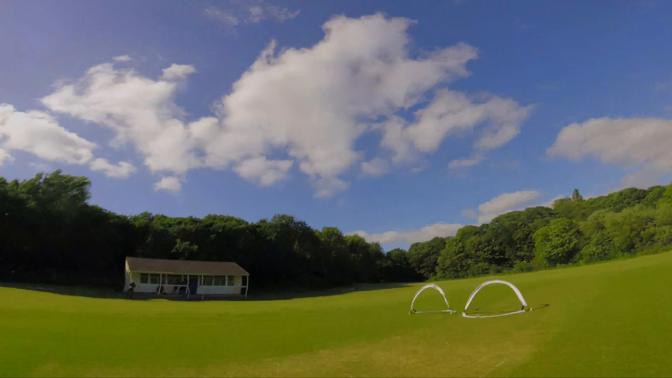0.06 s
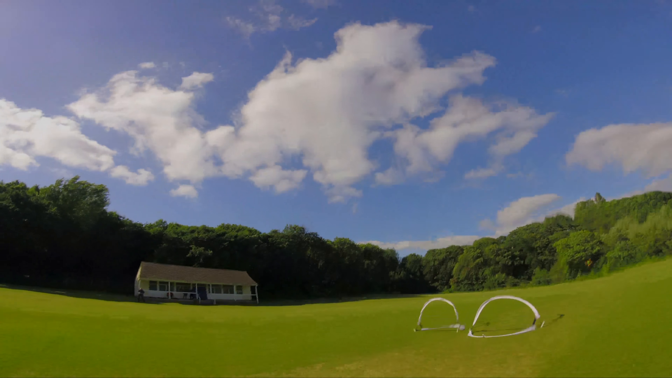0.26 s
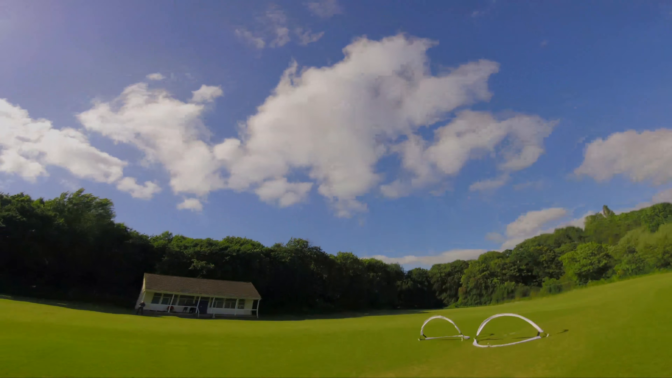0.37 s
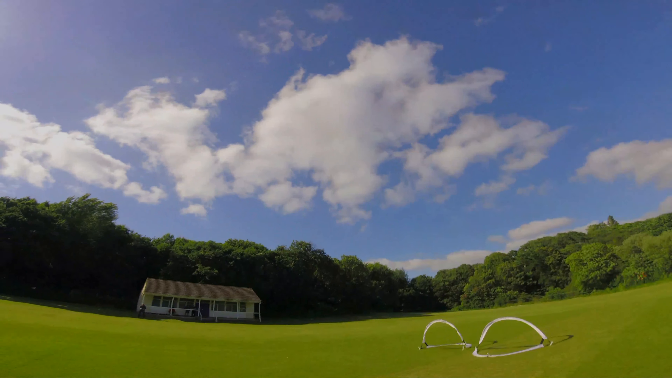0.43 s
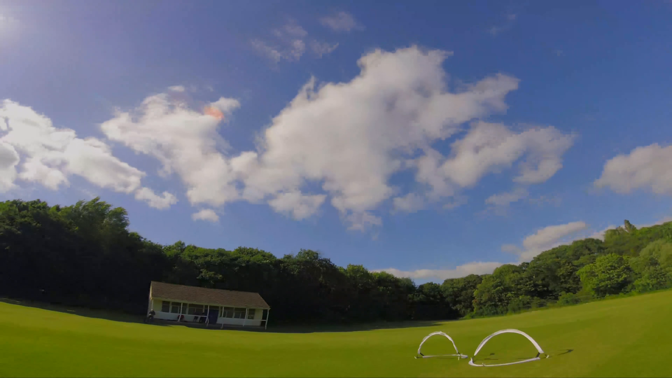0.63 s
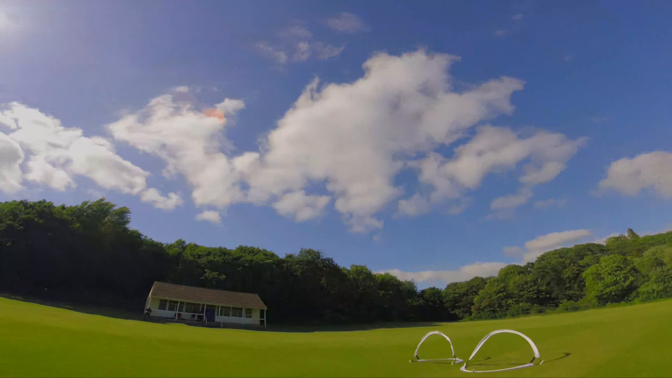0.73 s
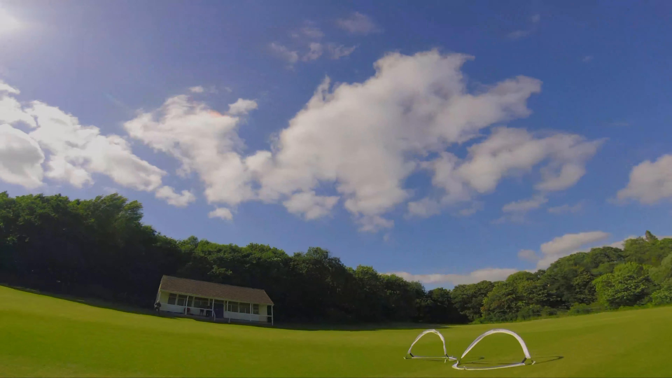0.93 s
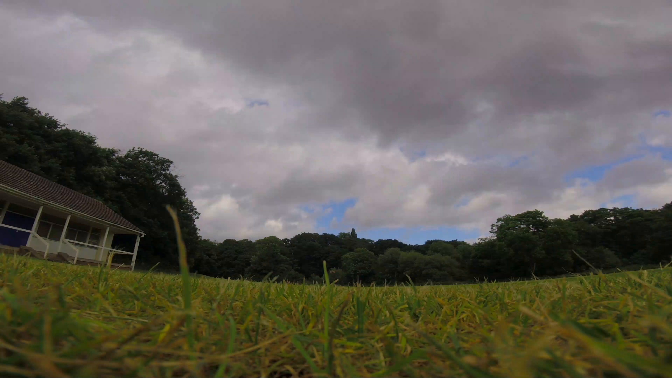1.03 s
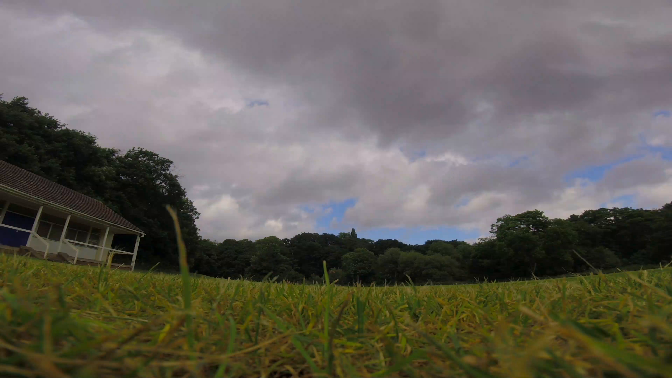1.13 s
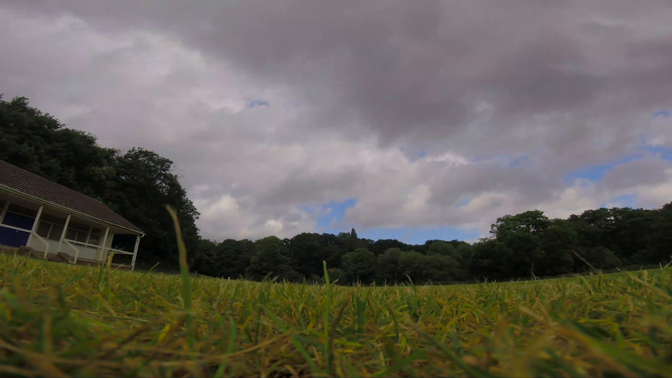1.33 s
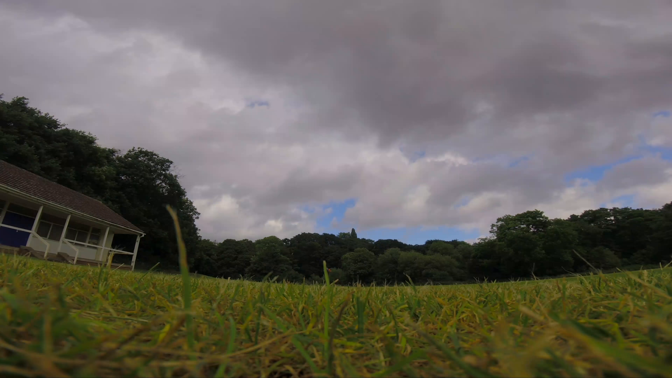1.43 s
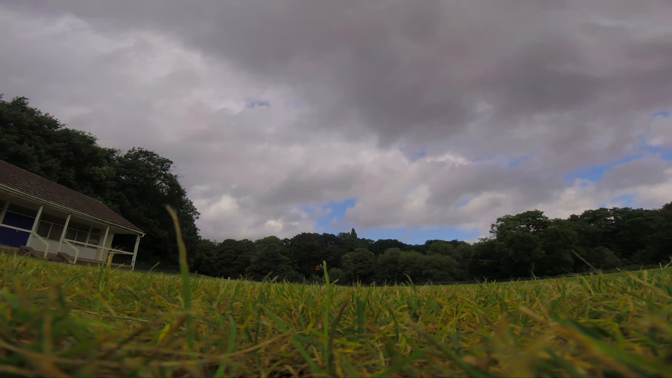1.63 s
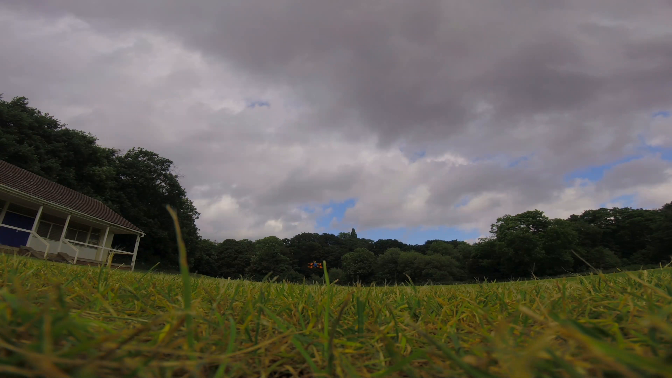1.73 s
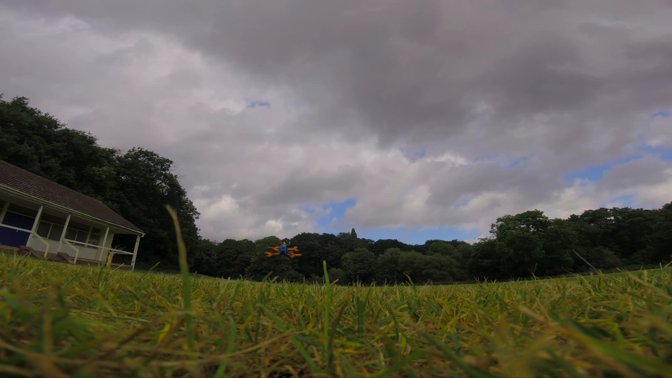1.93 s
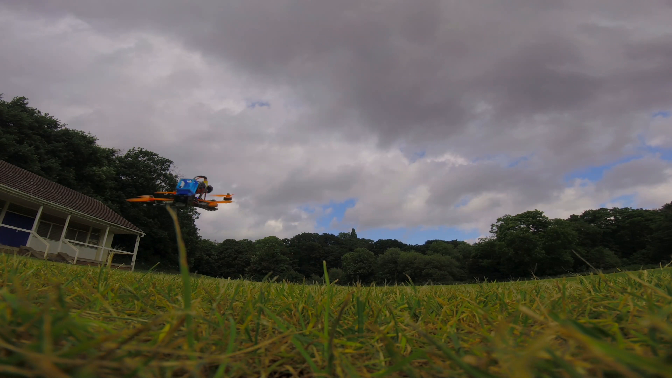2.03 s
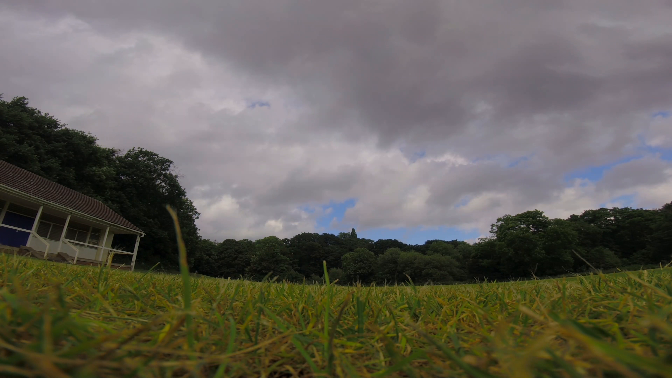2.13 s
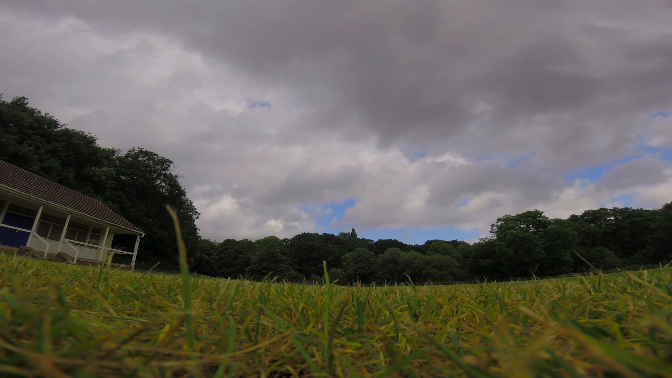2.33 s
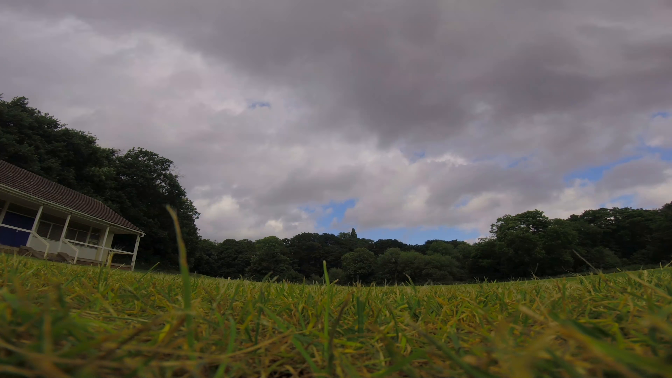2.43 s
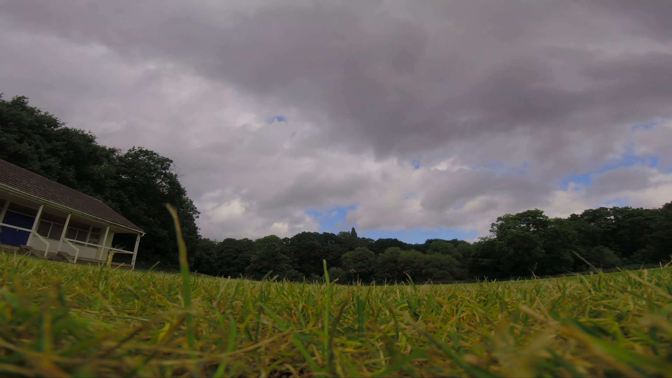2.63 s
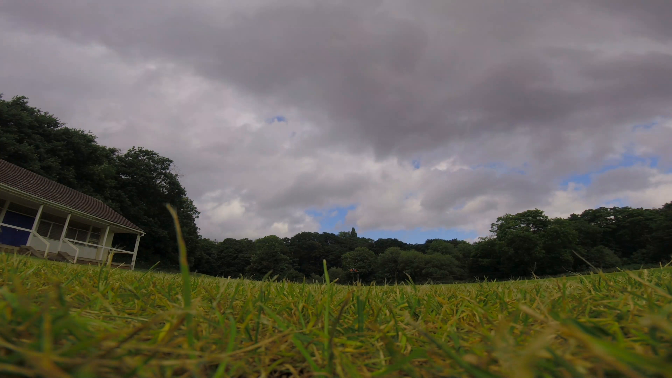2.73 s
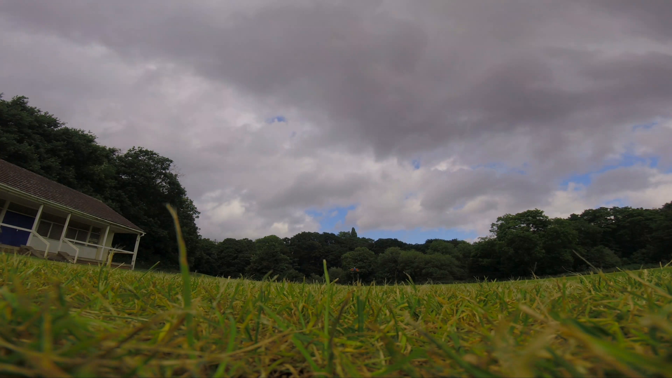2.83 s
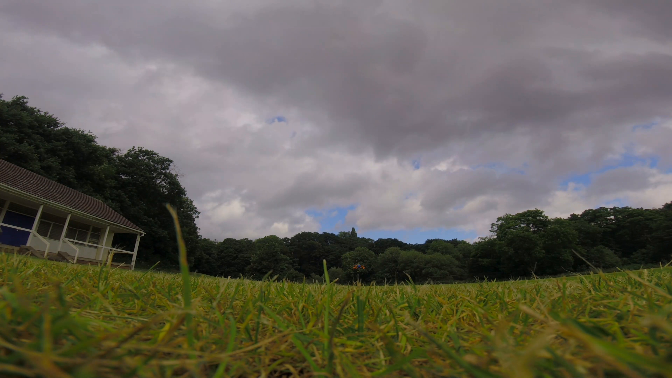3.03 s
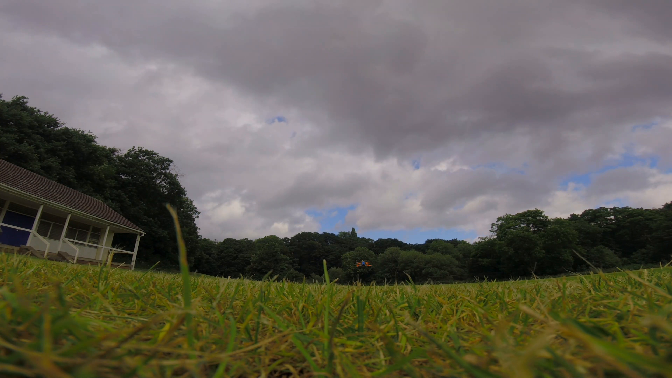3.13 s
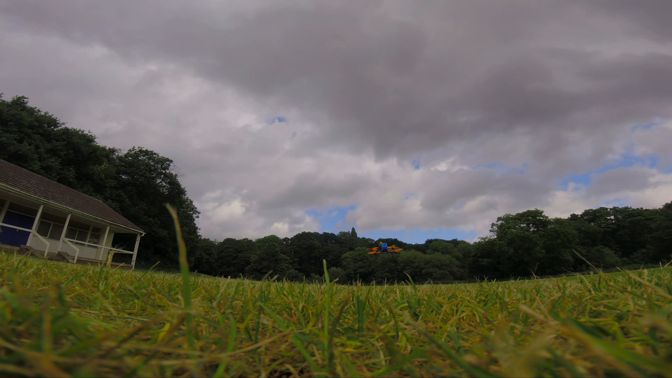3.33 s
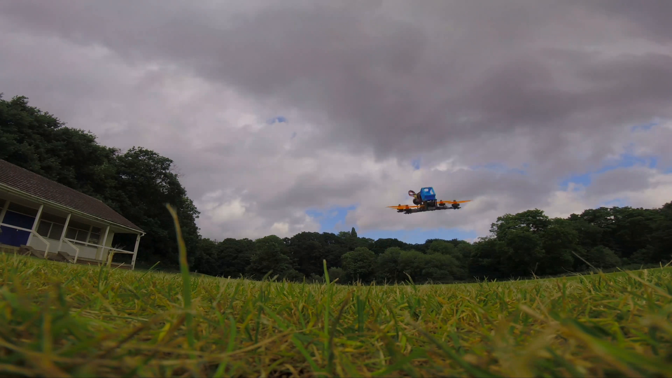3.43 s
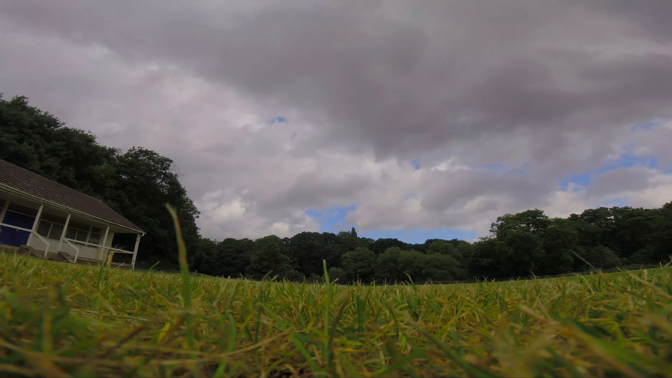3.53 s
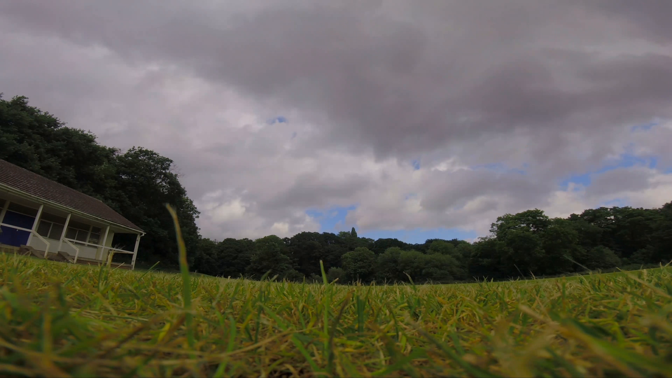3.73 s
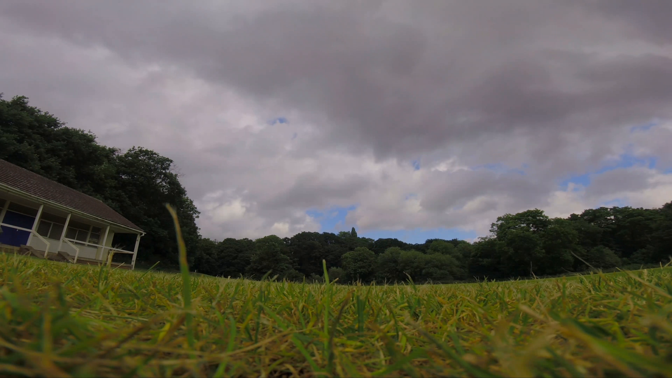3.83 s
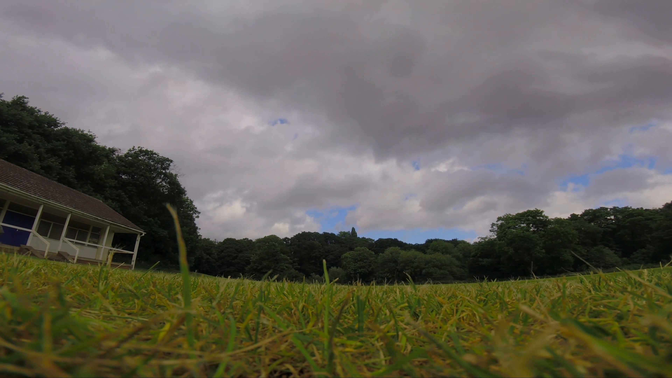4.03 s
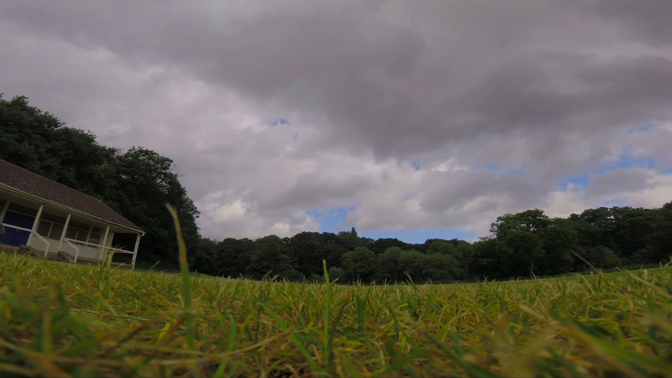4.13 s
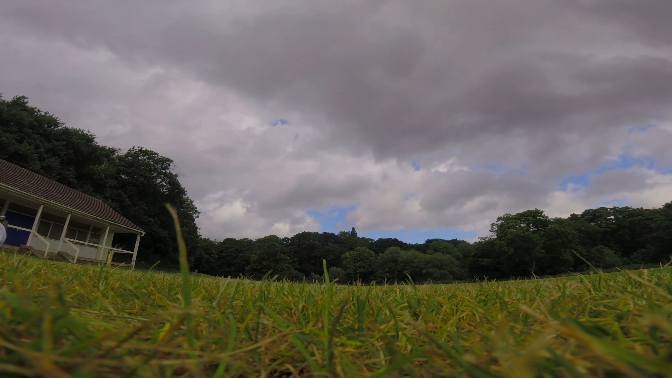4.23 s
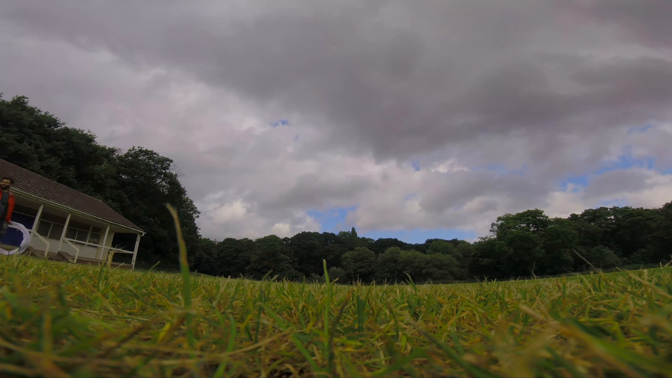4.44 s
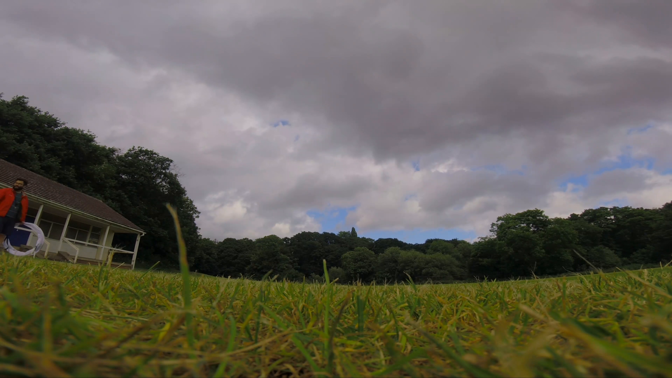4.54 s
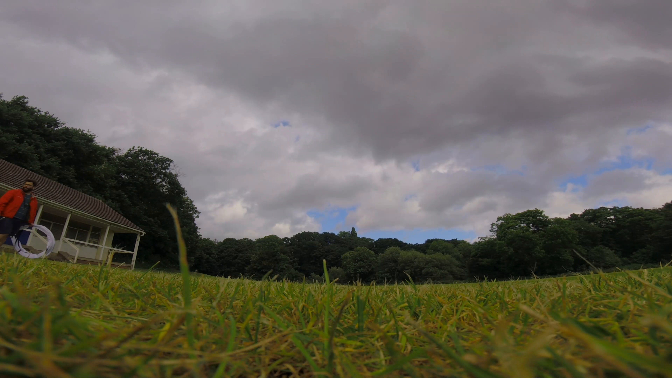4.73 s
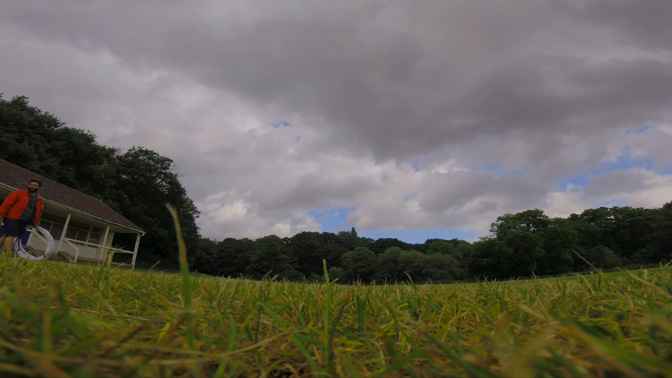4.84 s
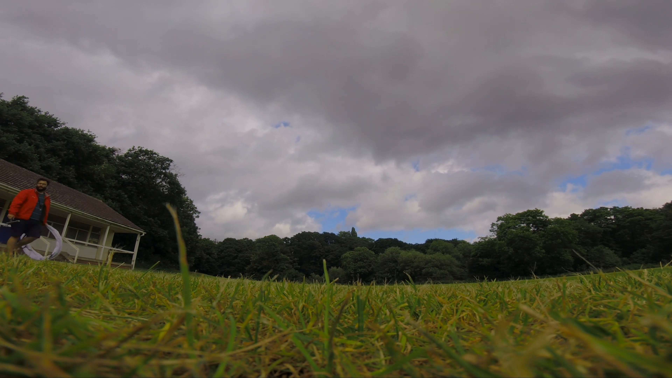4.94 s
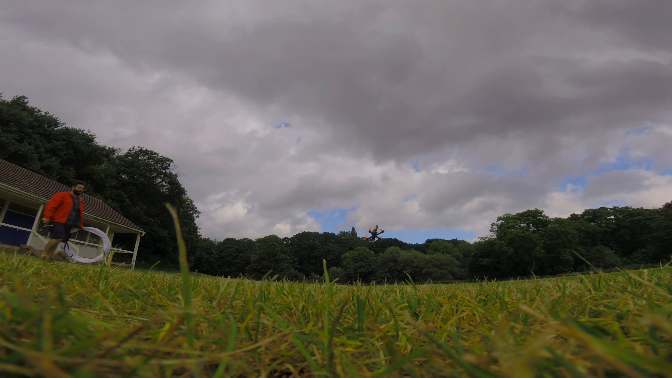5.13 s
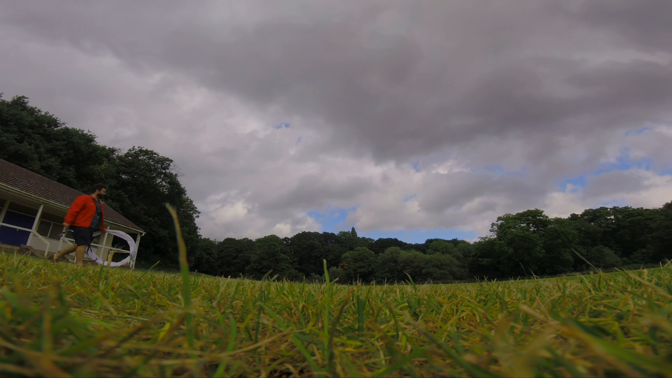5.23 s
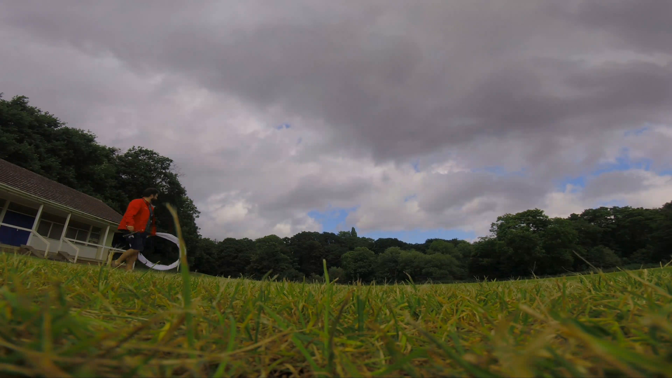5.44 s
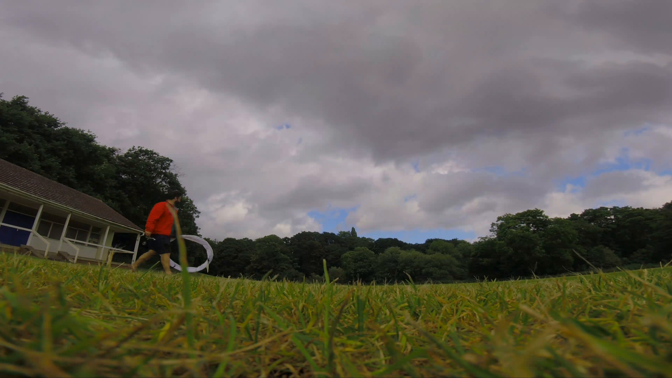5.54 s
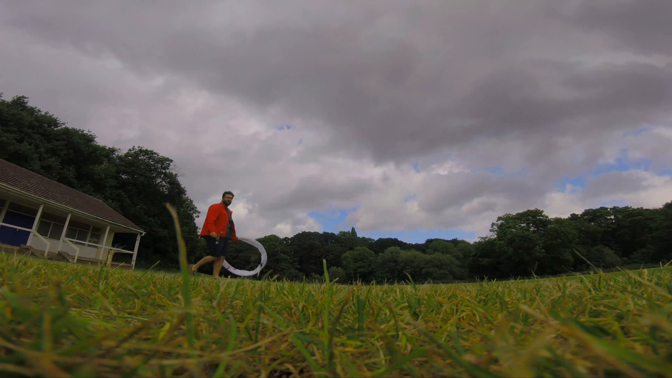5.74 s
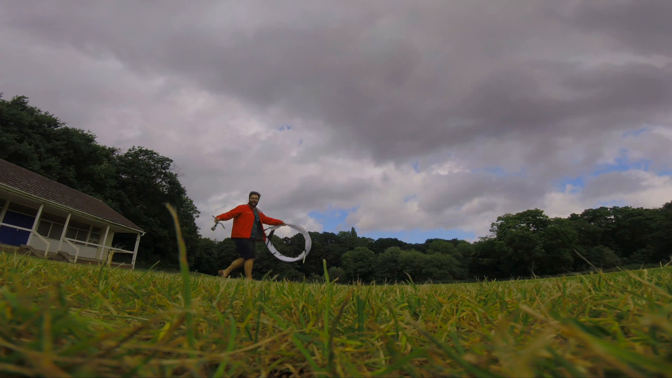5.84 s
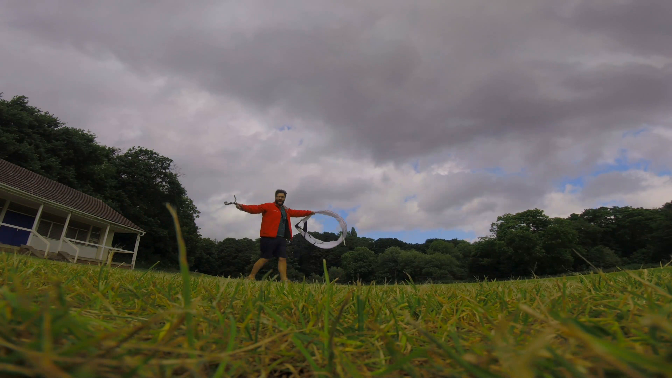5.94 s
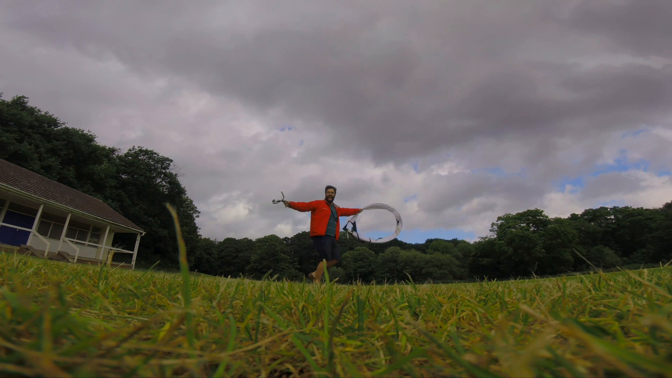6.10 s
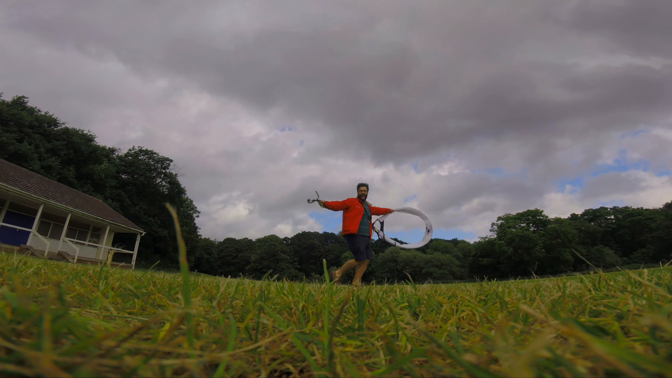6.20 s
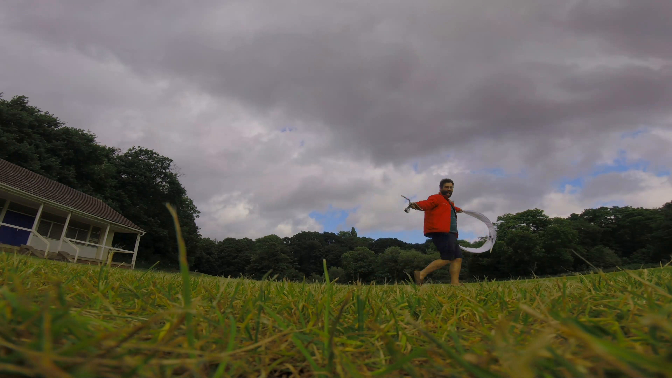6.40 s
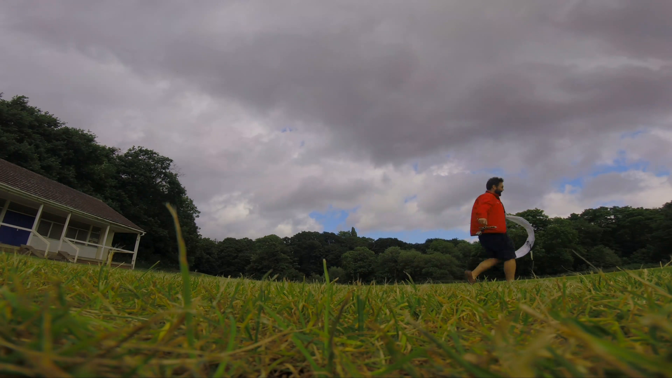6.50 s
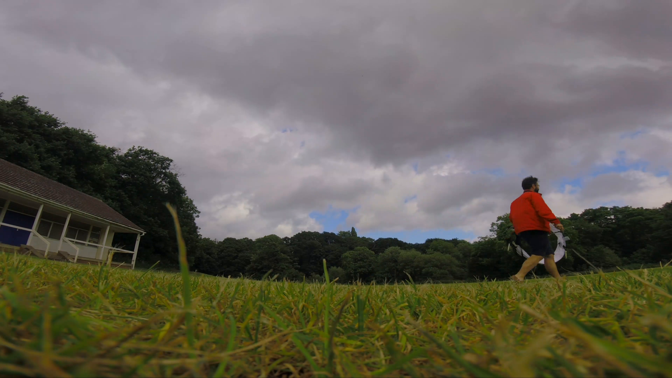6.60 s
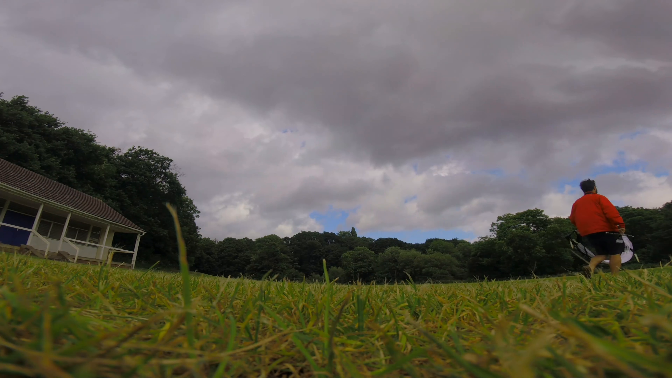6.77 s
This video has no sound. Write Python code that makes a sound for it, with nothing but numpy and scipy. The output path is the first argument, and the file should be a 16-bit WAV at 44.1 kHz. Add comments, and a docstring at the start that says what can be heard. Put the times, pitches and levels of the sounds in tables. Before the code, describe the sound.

A small racing drone whines close up, then makes several fast, buzzing fly-bys over a quiet open field.

```python
"""An open field with a small racing quadcopter. We ride on its frame as the throttle eases, then cut to
the grass for five low fly-bys, joined by hard cuts. Four three-bladed props whine and beat against each
other, the ground echo combs their rush of air, and the downwash buffets the microphone.
Behind it all are far traffic, trees and a few faint birds."""
import sys
import numpy as np
from scipy import signal
from scipy.fft import rfft, irfft, next_fast_len
from scipy.io import wavfile
from scipy.ndimage import uniform_filter1d, map_coordinates

SR = 44100
rng = np.random.default_rng(int(sys.argv[2]) if len(sys.argv) > 2 else 0)


def store_wav(level_fs):
    """Save 16-bit WAV to argv[1]."""
    pcm = np.round(np.clip(np.atleast_2d(level_fs), -1, 1) * 32767)
    wavfile.write(sys.argv[1], SR, pcm.T.astype(np.int16))


N = 429975
TIME = np.arange(N) / SR

# Noise colours. Each row: frequency in Hz, relative density in dB.
FIELD_COLOUR = [(18, -76), (30, -28), (110, -23.5), (150, 1.5), (185, -2.5), (274, -4.5), (374, -10.5),
                (404, -12.5), (735, -14.5), (905, -13.5), (1690, -26), (2370, -31), (3780, -45.5),
                (6880, -37), (15000, -45.5)]  # far traffic and trees
BUFFET_COLOUR = [(40, -39), (100, -24), (150, 9), (230, 0.5), (330, -11.5), (550, -19), (1000, -39),
                 (3000, -52), (9000, -90)]  # gusts on the microphone
RUMBLE_COLOUR = [(15, 3.5), (30, 2), (80, 6.5), (130, -0.5), (300, -7.5), (800, -63.5)]  # low wind
RATTLE_COLOUR = [(100, -3), (250, 5.5), (800, -3), (1300, -5), (2000, -10.5), (2500, -25), (3200, -31),
                 (4500, -53.5)]  # the shaking frame
FRAME_HISS_COLOUR = [(2350, -32.5), (4000, -10.5), (4270, -14.5), (5190, 3.5), (5920, -4.5), (6440, 0),
                     (7850, -8), (10200, -9.5), (12400, -33), (13700, -39.5), (14800, -37.5), (15000, -74)]  # prop air, on board
WAKE_COLOUR = [(50, -42), (110, -35), (180, 4.5), (400, 0), (900, 0.5), (1600, -15.5), (2400, -38),
               (3500, -29.5)]  # prop air from the grass: lows
RUSH_COLOUR = [(100, -54), (700, -14), (1400, -1), (2300, 0), (3400, -3), (4900, -6.5), (6100, -15),
               (6700, -24.5), (8000, -41.5)]  # its mids
HISS_COLOUR = [(100, -67), (4500, -4), (6100, 6.5), (6600, 3.5), (7300, 4), (9500, 0), (11100, -1),
               (11900, -29), (13200, -14), (15500, -26)]  # its top
# Bird calls. Each row: centre in seconds, pitch in Hz, level in dB, half length in seconds.
BIRD_CALLS = [(5.68, 2520, -61, 0.035), (5.75, 2880, -66, 0.015), (5.975, 4800, -69, 0.013),
              (6.055, 2290, -59, .02), (6.168, 1530, -50.5, 0.009), (6.322, 2570, -63, 0.035),
              (6.585, 2030, -61, .01), (6.72, 2200, -63, 0.011)]
# Downwash hits. Each row: centre in seconds, level in dB, half length in seconds.
WASH_PUFFS = [(3.696, -12, 0.0091), (3.762, -23, 0.022), (3.807, -16.5, 0.018), (3.873, -10, 0.016),
              (5.277, -36, 0.0047), (5.336, -23.5, 0.0072), (8.89, -34, 0.038), (8.989, -23.5, 0.013),
              (9.043, -23, 0.0088), (9.164, -32, 0.031), (9.516, -7.5, 0.0095), (9.549, -7, 0.016),
              (9.597, -12, 0.017), (9.661, -24.5, 0.041), (9.736, -25, 0.015)]
# Trailing eddies. Each row: peak in seconds, level in dB, time to build and to die away in seconds.
WASH_EDDIES = [(4.011, -36, 0.15), (4.51, -54, .05), (5.33, -39, .025), (8.899, -51, 0.052),
               (9.63, -19.5, 0.054), (9.75, -24, 0.038)]
# Motor speed on board. Each row: time in seconds, shaft rate in Hz.
SHAFT_SPEED = [(0.0, 271.4), (0.19, 258.7), (0.3, 237), (0.476, 168.6), (0.53, 175.4), (0.548, 159.2),
               (0.598, 174.1), (0.648, 158.1), (0.694, 169.4), (0.748, 160.8), (0.776, 169.9),
               (0.926, 163.1), (1.062, 167.7), (1.09, 170.6)]
# Frame whine. Each row: multiple of the shaft rate, relative dB at full throttle, relative dB cruising.
FRAME_OVERTONES = [(2, 2, -4.5), (3, -2.5, 2.5), (4, -20, -7.5), (5, -20.5, -13), (6, -16.5, -27.5),
                   (7, -13.5, -25), (8, -19, -24.5), (9, -34.5, -35), (10, -41.5, -23), (11, -55.5, -26),
                   (12, -56, -25.5), (13, -55, -33)]
# Resonances of the airframe. Each row: frequency in Hz, gain in dB.
FRAME_RESONANCES = [(330, 3.5), (510, -3), (630, -6.5), (700, -2), (780, 1.5), (1000, 9), (1300, -1),
                    (1530, 2.5), (1900, -4)]
# The start of each fly-by in seconds.
PASS_STARTS = [1.1012, 2.67, 3.8706, 7.638, 8.78]
# Blade rates before bursts, a list a pass. Each row: time in seconds, slow pair in Hz, fast pair in Hz.
BLADE_RATES = [
    [(1.1, 580, 635), (1.88, 596.4, 645.3), (1.955, 653, 722), (2.04, 673.4, 752), (2.17, 640.7, 704),
     (2.3, 629.2, 680.4), (2.67, 626.3, 693.7)],
    [(2.67, 529.5, 580.3), (3.22, 521.5, 570.6), (3.33, 612, 679.5), (3.44, 638, 712), (3.58, 586, 662.5),
     (3.68, 564, 646.3), (3.87, 488, 554)],
    [(3.87, 451.6, 514.8), (5.55, 470.8, 518)],
    [(7.64, 373.9, 425.7), (7.83, 375.8, 418), (7.93, 431, 474), (8.02, 495, 577.2), (8.2, 511.4, 576.7),
     (8.29, 532, 597.3), (8.49, 446.5, 529), (8.58, 486, 583), (8.78, 479.6, 599)],
    [(8.78, 512, 555), (8.92, 513, 547.4), (9.08, 543.3, 599.3), (9.28, 541.8, 599.8), (9.45, 611.3, 702),
     (9.58, 631.3, 725.5), (9.75, 584, 636)],
]
# Fly-bys. Each row: closest moment in seconds, height over speed in seconds, base levels in dB of
# shaft tone, blade tone, overtones and rush, steepness of the fade, lowest echo notch in Hz.
PASSES = [(2.13, 0.053, -22, -15.5, -22.5, -25.5, 1.055, 2470),
          (3.557, .043, -16, -13, -21, -21, 0.98, 2021), (5.107, 0.032, -25, -17, -28.5, -24.5, 1.37, 2070),
          (8.17, 0.083, -23.5, -16, -20, -18.5, 1.28, 1822),
          (9.382, 0.046, -17.5, -13, -21.5, -20, 0.97, 1680)]
# Throttle blips. Each row: peak in seconds, rise and sag in seconds, speed gained as a share,
# base level in dB of the flare heard from afar.
THROTTLE_BURSTS = [(2.665, .2, 0.0104, .03, -48), (4.05, 0.044, 0.084, .66, -43),
                   (4.47, 0.061, 0.092, 0.5, -55.5), (4.886, 0.058, 0.063, .37, -49),
                   (5.098, 0.039, .042, .52, -21.5), (5.31, 0.045, .11, .23, -51),
                   (7.645, .04, .07, .08, -51.5), (8.75, 0.055, 0.043, .04, -35.5)]
# How each layer carries. Each row: lead of its peak in flight heights, fall in dB per tenfold distance
# coming, the same going, gain in dB per octave above hover speed, trim in dB in a far burst.
LAYER_CARRY = {"shaft": (0.46, 36.5, 42, -0.5, -29), "blade": (1.27, 24, 22.5, 10.5, -2),
               "second": (-0.57, 22, 25.5, 21.5, -7), "third": (-0.1, 33, 32.5, 5.5, -11.5),
               "wake": (-0.5, 21.5, 24, 11, -9.5), "rush": (0.08, 32, 28.5, 12.5, -13),
               "hiss": (0.38, 32, 25.5, 17, -17.5)}


def undb(db):
    """Decibels to gain."""
    return 10 ** (np.asarray(db) / 20)


def unit(x):
    """Scale to rms 1."""
    return x / np.sqrt(np.mean(x ** 2))


def curves(rows):
    """The columns of a table, joined by straight lines in time."""
    s, *columns = np.transpose(rows)
    return [np.interp(TIME, s, c) for c in columns]


def noise(colour):
    """Noise of rms 1, shaped by (Hz, dB) points."""
    hz, db = np.transpose(colour)
    size = next_fast_len(N)
    bins_hz = np.maximum(np.arange(size // 2 + 1) * SR / size, 1)
    shape = undb(np.interp(np.log(bins_hz), np.log(hz), db))
    return unit(irfft(rfft(rng.standard_normal(size)) * shape, size)[:N])


def walk(rate):
    """Smooth random drift of rms 1 that changes `rate` times a second."""
    steps = rng.standard_normal(8192)
    drift = np.interp(TIME * rate, np.arange(len(steps)), steps)
    return unit(uniform_filter1d(drift, max(int(SR / rate), 1)))


def swell(centre_s, half_s):
    """A bell-shaped envelope."""
    return np.exp(-.5 * np.minimum(((TIME - centre_s) / half_s) ** 2, 100))


def phase(hz):
    """Running angle of a moving pitch, in radians."""
    return 2 * np.pi * np.cumsum(hz) / SR


def field_bed(level_db=-43.5):
    """Far traffic and trees: a gently breathing bed of noise."""
    return undb(level_db + 0.84 * walk(2.56)) * noise(FIELD_COLOUR)


def birds(glide=0.045, rasp=0.12):
    """Short distant calls, each an upward slide roughened by fast pitch jitter."""
    jitter = rasp * walk(400)
    calls = 0
    for s, hz, db, half_s in BIRD_CALLS:
        pitch = hz * (1 + glide * np.tanh((TIME - s) / half_s) + jitter)
        calls = calls + undb(db) * swell(s, half_s) * np.sqrt(2) * np.sin(phase(pitch))
    return calls


def downwash(low_cut_hz=125):
    """Puffs of prop wash thump the microphone just after a pass, and slow eddies follow."""
    puffs = sum(undb(db) * swell(s, half_s) for s, db, half_s in WASH_PUFFS)
    eddies = sum(undb(db) * np.exp(-np.abs(TIME - s) / life_s) for s, db, life_s in WASH_EDDIES)
    gust = noise(BUFFET_COLOUR)
    gust = gust / np.sqrt(uniform_filter1d(gust ** 2, size=700))  # each puff pushes with an even force
    thumps = signal.sosfilt(signal.butter(6, low_cut_hz, "high", fs=SR, output="sos"), puffs * gust)
    gate = (TIME < PASS_STARTS[2]) | (TIME > PASSES[2][0])  # chops one gust short with a click
    return thumps * gate + eddies * noise(RUMBLE_COLOUR)


def motor_ring(hiss_db, ring_hz=7450):
    """A thin high whine that wanders, comes and goes, and drowns in the hiss when the drone is close."""
    pitch = ring_hz * (1 + .018 * walk(9.1) + 0.02 * walk(500))
    level = undb(np.minimum(hiss_db - 11, -61) + 4 * walk(4.7))
    return level * np.sqrt(2) * np.sin(phase(pitch))


def frame_whine(hz, angle, power, flutter_db=2.5, neighbour_db=-11):
    """Shaft overtones ring through the frame and beat with a better balanced, slightly slower prop."""
    neighbour = phase(hz * .975 * (1 + 0.0249 * walk(17)))
    whine = 0
    for k, full_db, cruise_db in FRAME_OVERTONES:
        resonance_db = np.interp(k * hz, *np.transpose(FRAME_RESONANCES))
        gain = undb(cruise_db + power * (full_db - cruise_db) + resonance_db + flutter_db * walk(45))
        overtone = np.cos(k * angle + rng.uniform(0, 2 * np.pi))
        whine = whine + gain * (overtone + undb(neighbour_db) * np.cos(k * neighbour))
    return whine


def shaking_frame(wobble=.008, rattle_db=-12):
    """On board, one unbalanced prop shakes the frame; whine, rattle and wind grow with the throttle."""
    hz, = curves(SHAFT_SPEED)
    full_hz, cruise_hz = hz[0], hz[SR]
    power = np.clip((hz - cruise_hz) / (full_hz - cruise_hz), 0, 1)
    bite = power ** 0.54  # comes up with the first bit of throttle
    angle = phase(hz * (1 + wobble * walk(70.08)))
    whine = frame_whine(hz, angle, power)
    rattle = undb(rattle_db) * (1 + 0.29 * np.cos(angle)) * noise(RATTLE_COLOUR)  # pulses once a turn
    puffing = unit(np.exp(0.43 * (1 - power) * np.cos(angle)))  # so does the hiss, most at low speed
    hiss = undb(-48.7 + 7.8 * power) * puffing * noise(FRAME_HISS_COLOUR)
    wind = undb(-46 + 22.2 * bite) * noise(RUMBLE_COLOUR)
    jostle = .07 * walk(90)  # buffeting knocks the frame about
    hum = undb(-5.5 - 4.5 * power) * np.sqrt(2) * np.cos(angle + jostle)
    return hum + undb(-21 + 7.8 * bite) * (whine + rattle) + hiss + wind


def ground_echo(x, along, notch_hz, reach=1.28):
    """The bounce off the turf lags most with the drone overhead, so notches sweep down and up again."""
    elevation = 1 / np.hypot(1, (along - 0.17) / reach)
    climb_away = 0.59 * np.exp(-.5 * ((along - 2 * reach) / 6) ** 2) * (along > 0)
    lag_s = np.maximum(elevation, climb_away) / (2 * notch_hz)
    # the grass dulls the bounce, and swallows most of it at a shallow angle
    dulled = uniform_filter1d(x, size=3)
    reflect = .9 * (lag_s / lag_s.max()) ** .7
    bounce = map_coordinates(dulled, [(TIME - lag_s) * SR], order=1, mode="nearest")
    return (x + reflect * bounce) / np.sqrt(1 + reflect ** 2)


def throttle_bursts():
    """Blips of throttle: a factor on prop speed, and a flare in level that carries from afar."""
    throttle, flare = 1, 0
    for s, rise_s, sag_s, share, db in THROTTLE_BURSTS:
        burst = swell(s, np.where(TIME < s, rise_s, sag_s))
        throttle = throttle + share * burst
        flare = flare + undb(db) * burst
    return throttle, flare


def propeller(hz, wobble=0.00308, sideband_db=-17, flutter_db=3.5):
    """Three blades sing five layers: shaft tone, blade tone, second and third harmonics, high buzz."""
    blade = phase(hz * (1 + wobble * walk(110))) + 2 * np.pi * rng.random()
    shaft = blade / 3
    hum = np.sin(shaft) + undb(-9) * np.sin(2 * shaft)
    second = np.sin(2 * blade) + undb(sideband_db) * (np.sin(5 * shaft) + np.sin(7 * shaft))
    third = np.sin(3 * blade) + undb(sideband_db) * (np.sin(8 * shaft) + np.sin(10 * shaft))
    buzz = sum(undb(-2 * k) * np.sin(k * blade) for k in range(4, 11))
    cogging = undb(-15) * np.sin(24 * shaft)  # magnets pull past the twelve stator slots
    layers = hum, np.sin(blade), second, third, buzz + cogging
    return np.array([unit(layer) * undb(flutter_db * walk(18)) for layer in layers])


def prop_pair(hz, detune=.032, hunt=.006, twin_db=-5):
    """Two slightly detuned props beat and hunt as the flight controller trims them."""
    lead = propeller(hz * (1 + hunt * walk(8)))
    twin = propeller(hz * (1 - detune + 2 * hunt * walk(6)))
    return lead + undb(twin_db) * twin


def flybys(hover_hz=650, earshot_s=5.56):
    """Five low passes: the whine and chopped air of four props swell, sweep by and fade."""
    which = np.searchsorted(PASS_STARTS[1:], TIME)
    passes = np.array(PASSES)[which].T
    closest_s, span_s, shaft_db, blade_db, overtone_db, rush_db, steepness, notch_hz = passes
    along = (TIME - closest_s) / span_s  # distance along the track, in flight heights
    throttle, flare = throttle_bursts()
    slow_hz, fast_hz = throttle * np.choose(which, [np.array(curves(rows)) for rows in BLADE_RATES])

    def fader(layer, base_db):
        """A layer falls with distance, grows with prop speed and flares in a burst."""
        lead, coming_db, going_db, octave_db, flare_db = LAYER_CARRY[layer]
        place = along + lead
        fall_db = steepness * np.where(place < 0, coming_db, going_db) * np.log10(np.hypot(1, place))
        speed_db = octave_db * np.log2(fast_hz / hover_hz)
        return np.hypot(undb(base_db - fall_db + speed_db), undb(flare_db) * flare)

    slow_pair = prop_pair(slow_hz) * undb([[-4], [-4], [.5], [.5], [.5]])  # less body, more buzz
    shaft, blade, second, third, buzz = (unit(layer) for layer in slow_pair + prop_pair(fast_hz))
    tones = (fader("shaft", shaft_db) * shaft + fader("blade", blade_db) * blade
             + fader("second", overtone_db) * second)
    chop = 1 + 0.4 * np.sin(phase(fast_hz))  # each blade sheds its own gust
    rush = fader("rush", rush_db) * (chop * noise(RUSH_COLOUR) + undb(-7) * buzz)
    wake = fader("wake", overtone_db - 8.5) * noise(WAKE_COLOUR)
    hiss_gain = fader("hiss", rush_db - 11)
    hiss = hiss_gain * chop * noise(HISS_COLOUR)
    air = (wake + rush + hiss) * undb(walk(60))  # flickers by about 1 dB
    combed = ground_echo(air + fader("third", overtone_db - 3) * third, along, notch_hz)
    out_of_earshot = (TIME > earshot_s) & (TIME < PASS_STARTS[3])
    return (tones + combed + motor_ring(20 * np.log10(hiss_gain))) * ~out_of_earshot


def scene(cut_s=.00012):
    """A hard cut from riding on the frame to listening in the grass, in mono."""
    cut = np.clip((TIME - PASS_STARTS[0]) / cut_s, 0, 1)
    on_board = shaking_frame()
    in_grass = flybys() + downwash() + field_bed() + birds()
    return ((1 - cut) * on_board + cut * in_grass)[None]


def record(dry):
    """Round off the highest peaks and cut the very top."""
    top_hz = 15400
    rounded = dry / (1 + np.abs(dry) ** 8) ** (1 / 8)
    return signal.sosfilt(signal.ellip(8, .2, 70, top_hz, fs=SR, output="sos"), rounded)


dry = scene()
out = record(dry)
store_wav(out)
```